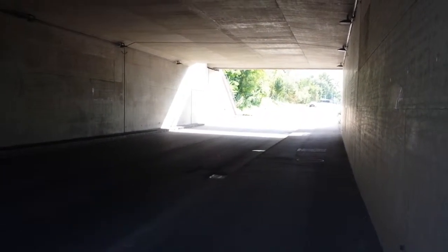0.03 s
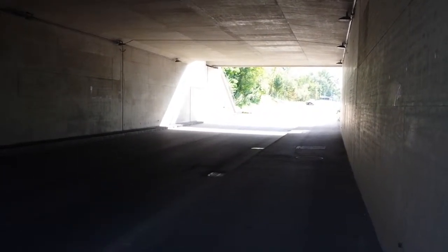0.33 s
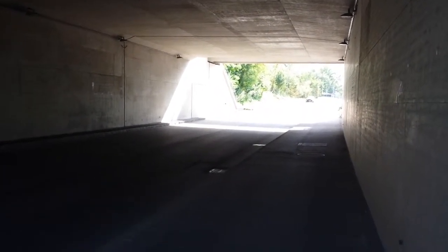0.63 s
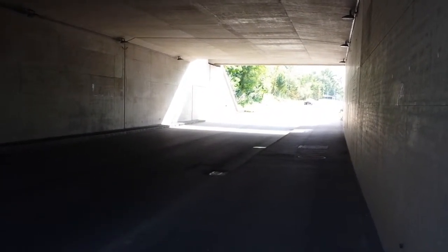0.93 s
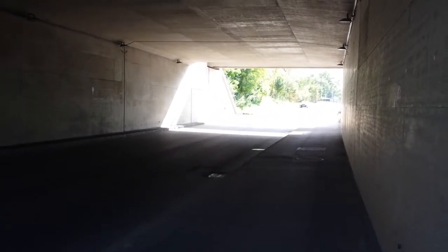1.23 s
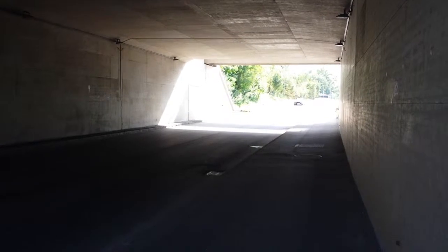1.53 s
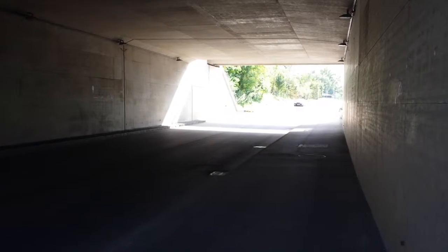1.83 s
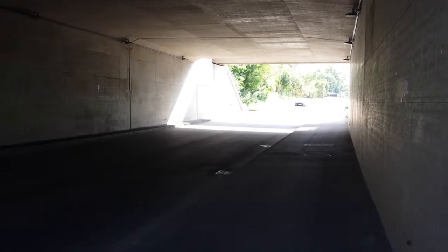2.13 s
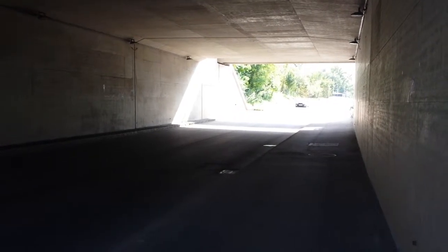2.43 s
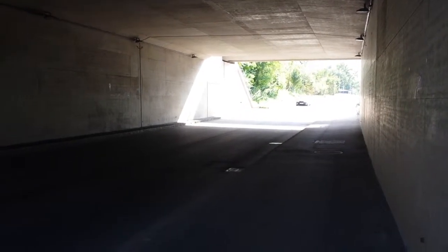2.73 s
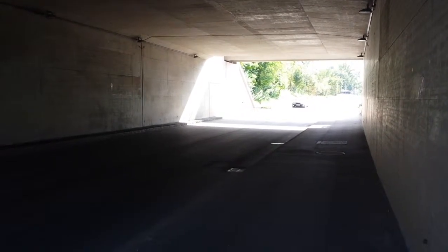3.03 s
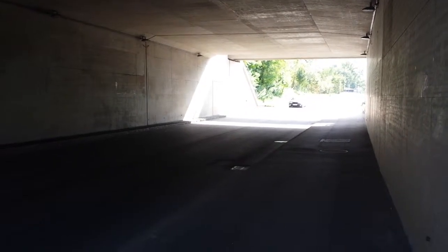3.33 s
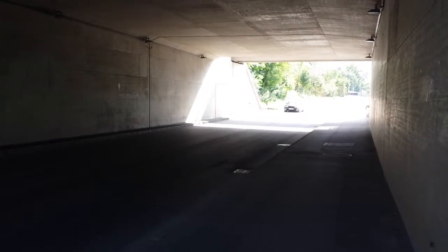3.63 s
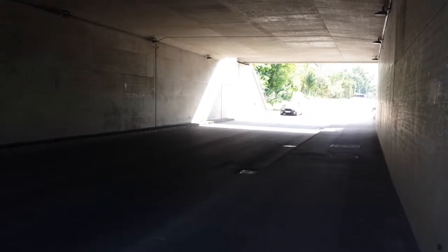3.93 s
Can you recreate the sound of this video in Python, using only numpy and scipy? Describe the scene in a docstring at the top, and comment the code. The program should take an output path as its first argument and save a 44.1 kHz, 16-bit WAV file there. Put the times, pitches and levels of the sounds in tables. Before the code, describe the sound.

A car's loud exhaust drones as it approaches an echoing underpass, tyre roar swelling.

```python
"""A loud exhaust drones and climbs in pitch as a car accelerates towards a concrete underpass.
The car lifts off with a few soft pops, then pulls again close to the mouth. Its note is the harmonic
series of the engine's firings, shaped by pipe resonances and prolonged by the echo of the walls.
Tyre roar swells between the walls over a distant hiss, while a draught buffets the two microphone
ports, mostly the right one."""
import sys
import numpy as np
from scipy import signal
from scipy.fft import rfft, irfft
from scipy.io import wavfile
from scipy.ndimage import uniform_filter1d

SR = 44100
rng = np.random.default_rng(int(sys.argv[2]) if len(sys.argv) > 2 else 0)


def to_wav(s):
    """Save 16-bit WAV."""
    ch = np.atleast_2d(s).T  # columns
    pcm = np.round(np.clip(ch, -1, 1) * 32767)  # PCM
    wavfile.write(sys.argv[1], SR, pcm.astype(np.int16))


N = 176400
LEFT_LEAD_S = 0.0001  # diffuse sound reaches the left port first


# Engine speed: (time [s], firing rate [Hz])
FIRING_RATE = [(0, 68.37), (.25, 70.72), (.6, 78.2), (1, 87.32), (1.5, 98.95), (1.6, 100.2), (1.72, 99.7),
               (1.9, 102.6), (2.2, 102.7), (3.3, 100.7), (3.58, 101.4), (3.77, 104.5), (3.95, 102.1)]

def engine():
    """Periodic firing sets the fundamental: returns its slightly unsteady rate [Hz] and phase [rad]."""
    hz = curve(FIRING_RATE) * (1 + 0.004 * walk(24))
    return hz, 2 * np.pi * np.cumsum(hz) / SR


# Exhaust strength: (time [s], level [dB], then relative to it: fundamental [dB],
# odd harmonics from the 3rd [dB], even harmonics from the 4th [dB])
EXHAUST_LEVELS = [(0, -26, -8, -10, -9), (.08, -30, -26, -24, 5.5), (.52, -25, -28, -2, -2),
                  (.72, -24.5, -12, -4.5, -16.5), (1, -18.5, -16, -16, -10), (1.12, -19.5, -15, -7.5, 4),
                  (1.3, -18.5, -9, -7.5, 6.5), (1.47, -14.5, -16, -3.5, 4), (1.6, -16, -26, 0.5, 3),
                  (1.7, -19, -18, -10.5, -2), (1.87, -30, -22, 3, -9), (2.17, -28.5, -19, -3, -15),
                  (2.22, -53, -12, -8, -10), (2.46, -43, -13, 17, -8), (2.56, -49, 4, 11, 0),
                  (3.18, -42.5, -12, 10, 0), (3.4, -43.5, 18.5, 14, 12), (3.57, -35.5, 8.5, 2.5, -7),
                  (3.65, -22, 1.5, -12, -11), (3.7, -24.5, -8, -18, -21), (3.77, -20.5, 0.5, 1, -8),
                  (3.93, -19.5, -1.5, 1.5, 1.5)]
# Pipe response through the underpass: (frequency [Hz], gain with car far [dB], gain with car near [dB])
PIPE_RESPONSE = [(136, -3, -8), (166, 0, -16), (204.6, -1.5, 2), (265, -11.5, -7), (283, -7, 0.5),
                 (319.2, -12.5, -8), (333, -9, -24), (420, -32, -8.5), (470, -6.5, -28), (493.5, -7, -13.5),
                 (582, -27, -13), (628, -25, -16), (733, -42, -34), (810, -37, -35), (1110, -36.5, -24),
                 (1400, -42, -26)]
# Rasp of the pipe once the car is near: (time [s], level [dB])
RASP_LEVEL = [(3.4, -75), (3.68, -37), (3.82, -28), (4, -43)]

def exhaust(hz, phase):
    """Source and filter: firing harmonics sweep through pipe resonances; unequal cylinders add growl."""
    load, boom, odd, even = (undb(curve(EXHAUST_LEVELS, axis=k)) for k in (1, 2, 3, 4))
    near = curve([(2.2, 0), (3.5, 1)])
    growl = undb(-22 + 8 * near)
    rasp_hz, rasp_octaves = 708, 0.038
    note, rasp = 0, 0
    for order in np.arange(2, 37) / 3:  # multiples of the firing rate, in thirds
        partial_hz = order * hz
        waver_db = .75 if order <= 2 else 1.8
        wave = np.sqrt(2) * np.sin(order * phase + rng.uniform(0, 2 * np.pi))
        wave *= undb(waver_db * walk(9))
        far_gain, near_gain = (tone(PIPE_RESPONSE, partial_hz, axis=k) for k in (1, 2))
        pipe = (1 - near) * far_gain + near * near_gain
        if order == 1:
            gain = boom
        elif order == 2:
            gain = pipe
        elif order % 1:
            gain = growl * np.sqrt(pipe)
        else:
            gain = pipe * (odd if order % 2 else even)
        note += load * gain * wave
        rasp_band = np.exp(-.5 * (np.log2(partial_hz / rasp_hz) / rasp_octaves) ** 2)
        rasp += wave * rasp_band * (.5 if order % 1 else 1)
    return note + undb(curve(RASP_LEVEL)) * unit(rasp)


# Burble, most exposed off throttle: (time [s], level [dB])
BURBLE_LEVEL = [(0, -64), (1.45, -38.5), (1.75, -31), (2.05, -43), (2.38, -48), (2.6, -29.5), (2.85, -30.5),
                (3.08, -26), (3.35, -37.5), (3.7, -38.5), (4, -38)]
# Pipe response to a weak firing: (frequency [Hz], relative gain [dB])
BURBLE_RESPONSE = [(40, -49), (95, -8.5), (135, -7), (210, 0), (260, -13.5), (305, -16.5), (400, -10),
                   (520, -4), (620, -18.5), (900, -25.5)]

def burble(phase):
    """Impulse excitation: weak firings, uneven in size and timing, ring the pipe."""
    firings = np.flatnonzero(np.diff(phase // (2 * np.pi)))
    size, late = rng.standard_normal((len(firings), 2)).T
    jitter_s, scatter_db = .0035, 7
    onsets = np.clip(firings + (late * jitter_s * SR).astype(int), 0, N - 1)
    pulses = np.zeros(N)
    pulses[onsets] = undb(scatter_db * np.tanh(size / 2))
    hz = bins()
    log_gain = np.log(tone(BURBLE_RESPONSE, hz) / (1 + (hz / 1100) ** 4))
    mirrored = np.r_[log_gain, log_gain[-2:0:-1]]
    pipe = np.exp(np.conj(signal.hilbert(mirrored)))[:len(hz)]  # minimum phase, hence causal
    return unit(irfft(rfft(pulses) * pipe, N)) * undb(curve(BURBLE_LEVEL))


# Pops in the exhaust off throttle: (time [s], peak level [dB], boom frequency [Hz])
OVERRUN_POPS = [(2.227, -26, 120), (2.464, -22.5, 233.8), (2.527, -19, 200), (2.595, -27, 188),
                (2.703, -25, 113.9), (2.802, -18.5, 171), (2.943, -17, 105.8), (2.964, -20, 173),
                (3.073, -17, 205.7)]

def backfires():
    """Damped oscillation: each overrun pop is a short boom of the pipe, roughened by phase modulation."""
    rise_s, decay_s = 0.003, 0.012
    out, rough = 0, 0.65 * walk(105)
    for at, db, hz in OVERRUN_POPS:
        t = np.arange(N) / SR - at
        envelope = np.exp(np.minimum(t / rise_s, -t / decay_s))
        out -= undb(db) * envelope * np.cos(2 * np.pi * hz * t + rough)
    return out


def underpass(x):
    """Reverberation: concrete walls add an exponentially decaying diffuse field to the direct sound."""
    t = np.arange(N) / SR
    t60_s, build_s, echo_db = 1.4, 0.0067, -16
    left_db, right_delay_s = -0.67, .0002
    tail = irfft(diffuse(LEFT_LEAD_S), N) * undb(-60 * t / t60_s) * np.minimum(t / build_s, 1)
    echo = signal.fftconvolve(x[None], unit(tail) / np.sqrt(N), axes=1)[:, :N]
    direct = np.array([x * undb(left_db), np.interp(t - right_delay_s, t, x)])
    return direct + undb(echo_db) * echo


# Tyre roar: (time [s], level [dB], relative treble [dB])
TYRE_LEVELS = [(0, -40.5, -9), (1, -39, -24), (1.6, -37, -8), (2.2, -31, -2), (2.4, -34.5, 2.5),
               (2.7, -28.5, 0), (3.1, -24, -4), (3.45, -22, -3), (3.7, -18.5, -3), (3.9, -17.5, -1.5),
               (4, -21.5, 2)]
# Its colour: (frequency [Hz], left gain [dB], right gain [dB])
TYRE_SPECTRUM = [(30, 3, -13), (100, -9.5, -8), (390, -9.5, -0.5), (597, 11, 7.5), (650, 4.5, 2.5),
                 (873, -0.5, 1.5), (1076, 3.5, 8), (1270, 6.5, 3.5), (1450, 3.5, -2), (1820, 3, 7.5),
                 (2080, 1.5, -3.5), (2500, 3, -2.5), (2830, -0.5, 0), (3460, -7, -6.5), (4440, -7.5, -4),
                 (4800, -8, -10.5), (5700, 2, -7), (6470, -1.5, -6), (8080, -14.5, -6.5),
                 (8900, -21.5, -15), (10560, -43, -13.5), (11900, -56, -30)]

def tyres():
    """Rolling contact radiates broadband noise, which swells as the car nears."""
    return road_noise(TYRE_LEVELS, TYRE_SPECTRUM)


# Resonances of the underpass: (frequency [Hz], width [Hz], boost [dB])
UNDERPASS_MODES = [(713, 31, 5), (1063, 17, 4.5), (1260, 24, 4), (1685, 23, 4.5), (1990, 107, 6),
                   (2180, 86, 5), (2507, 38, 7.5), (3600, 130, 2), (5830, 120, 2.5)]

def road_noise(levels, colour):
    """Cavity resonance: the underpass colours rolling noise; body and treble flicker slightly."""
    hz = bins()
    crossover_hz, flicker_db = 1450, 0.39
    modes_db = sum(db / (1 + (2 * (hz - centre) / width) ** 2) for centre, width, db in UNDERPASS_MODES)
    port_gains = np.array([tone(colour, hz, axis=k) for k in (1, 2)])
    spectrum = wall_interference(diffuse(LEFT_LEAD_S) * undb(modes_db) * port_gains)
    low = 1 / (1 + (hz / crossover_hz) ** 4)
    body = irfft(spectrum * low, N) * undb(flicker_db * walk(4.2))
    treble = irfft(spectrum * (1 - low), N) * undb(curve(levels, axis=2) + flicker_db * walk(6.1))
    return (body + treble) * undb(curve(levels))


def wall_interference(spectrum):
    """Interference of reflections ripples a spectrum; random patterns crossfade as the traffic moves."""
    hz, t, out = bins(), np.arange(N) / SR, 0
    fade_s, ripple_db = .8, 3
    for at in np.arange(0, N / SR + fade_s / 2, fade_s):
        jagged = rng.standard_normal(len(hz))
        ripple = unit(uniform_filter1d(uniform_filter1d(jagged, size=130), size=130))
        share = np.maximum(1 - np.abs(t - at) / fade_s, 0)
        out += share * irfft(spectrum * undb(ripple_db * ripple / (1 + hz / 5000)), N)
    return rfft(unit(out))


# Singing bands in the road noise: (centre [Hz], half-width at 12 dB down [Hz])
SINGING_BANDS = [(1130, 126), (3150, 260)]
# Their strength: (time [s], low band level [dB], high band level [dB])
SINGING_LEVELS = [(0, -73, -71), (.9, -56, -51.5), (1.55, -33, -46), (2.15, -37, -43.5), (2.7, -43, -44.5),
                  (3.4, -40, -60), (3.9, -23.5, -64)]

def singing():
    """Narrow-band noise is heard as pitch: two bands stand out as the car lines up with the underpass."""
    out = 0
    for k, (centre, width) in enumerate(SINGING_BANDS, start=1):
        band = 1 / (1 + ((bins() - centre) / width) ** 2) ** 2
        noise = unit(irfft(diffuse(lead_s=0.0003) * band, N))
        out += noise * undb(curve(SINGING_LEVELS, axis=k))
    return out


# Draught rumble: (time [s], left level [dB], right level [dB])
DRAUGHT_LEVELS = [(0, -31.5, -37), (.45, -26, -26), (.7, -29.5, -37), (1.25, -31.5, -37),
                  (1.8, -32.5, -23.5), (2.05, -29, -32), (2.35, -42.5, -43), (2.7, -29.5, -34),
                  (4, -37, -48)]
# Its colour: (frequency [Hz], relative gain [dB])
DRAUGHT_SPECTRUM = [(15, -27), (40, -4), (85, 10.5), (130, -2), (200, -3.5), (330, -11), (600, -83)]
# Eddies at the right port: (time [s], level before windowing [dB], frequency [Hz])
EDDIES = [(0.026, -8.5, 223), (0.194, -11.5, 153), (0.288, -7.5, 192), (0.496, -6, 236), (.515, -9, 200),
          (0.587, -5, 215), (0.782, -12, 126), (0.825, -14.5, 214), (1.024, -4.5, 203.8), (1.037, -6, 225),
          (1.178, -8, 160), (1.446, -8.5, 170.2), (1.702, -9.5, 252.4), (1.867, -8.5, 151),
          (3.16, -12.5, 179.8)]

def wind():
    """Turbulent pressure rumbles on both ports; single eddies thump the right one, each in a short wake."""
    def rumble():
        return unit(irfft(rfft(rng.standard_normal(N)) * tone(DRAUGHT_SPECTRUM, bins()), N))

    gust_db, gust_hz = 10, 25.7
    eddy_cycles, wake_db, wake_s = 0.31, -13.5, 0.013
    ports = np.zeros((2, N))
    for side in (0, 1):
        gusty = rumble() * undb(gust_db * np.tanh(walk(gust_hz)))
        ports[side] = unit(gusty) * undb(curve(DRAUGHT_LEVELS, axis=side + 1))
    wake = unit(signal.sosfilt(signal.butter(2, [90, 300], "band", fs=SR, output="sos"), rumble()))
    for at, db, hz in EDDIES:
        t = np.arange(N) / SR - at
        eddy = -np.sin(2 * np.pi * hz * t) * np.exp(-.5 * (hz * t / eddy_cycles) ** 2)
        ports[1] += undb(db) * (eddy + undb(wake_db) * wake * np.exp(-np.abs(t) / wake_s))
    return ports


# Distant road noise: (time [s], level [dB], relative treble [dB])
DISTANT_LEVELS = [(0, -34, -7), (.15, -32.5, -5), (.5, -31.5, -4), (.9, -29, -4.5), (1.45, -29, -3),
                  (1.8, -28.5, -5), (2.3, -27.5, -11), (3, -29.5, -1), (4, -36.5, 4.5)]
# Its colour: (frequency [Hz], left gain [dB], right gain [dB])
DISTANT_SPECTRUM = [(30, -11, -3), (100, -9, -5.5), (303, -3, -1), (430, -11.5, -16.5), (765, -12.5, -4.5),
                    (790, -1, -0.5), (866, -4.5, -7), (1280, -4, -4), (1540, -11, -14.5),
                    (2330, -13.5, -18.5), (2340, -25.5, -24), (2720, -21.5, -21), (3200, -18, -16),
                    (3530, -34, -13.5), (3800, -18, -8.5), (4780, -24.5, -17), (5150, -12.5, -17),
                    (5910, -7.5, -24), (6540, -10, -15.5), (7100, -25, -14.5), (8080, -31, -22),
                    (9200, -33, -31.5), (10000, -31.5, -24.5), (12000, -67, -41.5)]

def distant_road():
    """Transmission through an opening: far road noise and hiss enter by the mouth."""
    return road_noise(DISTANT_LEVELS, DISTANT_SPECTRUM)


def diffuse(lead_s):
    """Diffuse-field coherence: left and right noise spectra, alike in the bass, barely so in the treble."""
    mid, side = rfft(rng.standard_normal((2, N)))
    coherence = np.clip(0.09 + 1.19 / (1 + (bins() / 1040) ** 4), 0, 1)
    common = mid * np.sqrt((1 + coherence) / 2)
    opposed = side * np.sqrt((1 - coherence) / 2)
    advance = np.exp(2j * np.pi * bins() * lead_s)
    return np.array([(common + opposed) * advance, common - opposed])


def walk(rate_hz):
    """Low-passed noise: smooth random motion with rms 1."""
    return unit(irfft(rfft(rng.standard_normal(N)) * np.exp(-(bins() / rate_hz) ** 2), N))


def curve(rows, axis=1):
    """One column of a time table, interpolated at every sample."""
    rows = np.array(rows, float)
    return np.interp(np.arange(N) / SR, rows[:, 0], rows[:, axis])


def tone(rows, hz, axis=1):
    """Gain of a spectrum table, interpolated in log frequency."""
    rows = np.array(rows, float)
    return undb(np.interp(np.log(hz), np.log(rows[:, 0]), rows[:, axis]))


def bins():
    """Frequencies [Hz] of the full-length spectrum."""
    return np.maximum(np.arange(N // 2 + 1) * SR / N, 1)


def undb(db):
    """Decibels to amplitude ratio."""
    return 10 ** (np.asarray(db) / 20)


def unit(x):
    """Normalisation to rms 1."""
    return x / np.sqrt(np.mean(x ** 2))


def scene():
    """Superposition: the car, the road beyond it and the draught add at the two ports."""
    hz, phase = engine()
    tailpipe = exhaust(hz, phase) + burble(phase) + backfires()
    return underpass(tailpipe) + tyres() + distant_road() + singing() + wind()


def record(dry):
    """Band limiting: filters remove the deepest rumble and the top of the treble."""
    dry = signal.sosfilt(signal.butter(2, 22, "high", fs=SR, output="sos"), dry)
    return signal.sosfilt(signal.ellip(8, .2, 70, 11800, fs=SR, output="sos"), dry)


dry = scene()
out = record(dry)
to_wav(out)
```